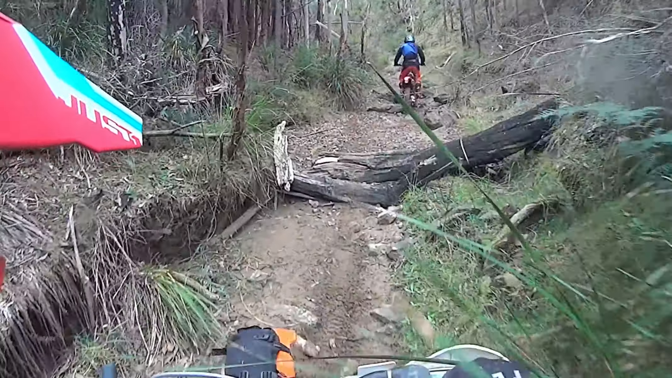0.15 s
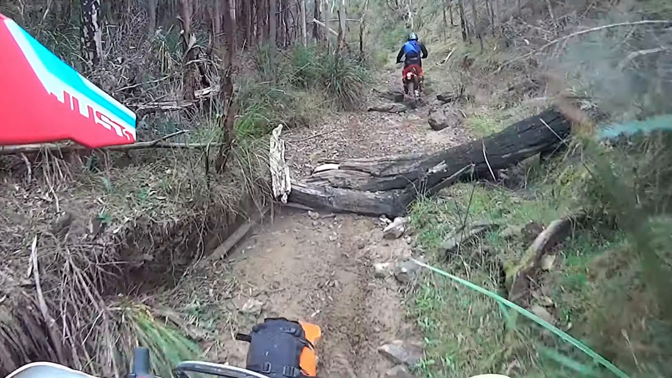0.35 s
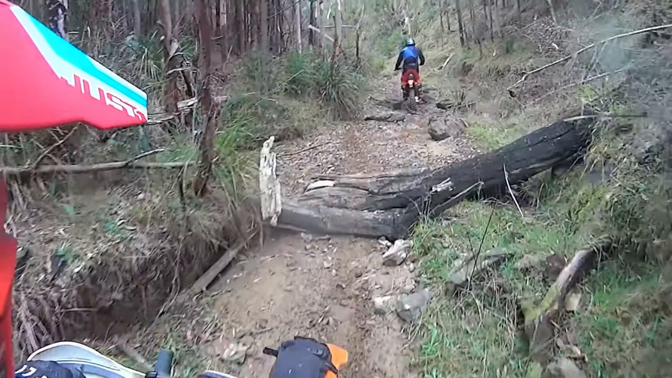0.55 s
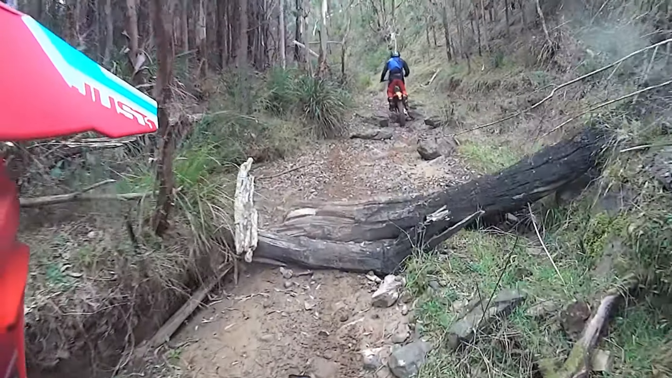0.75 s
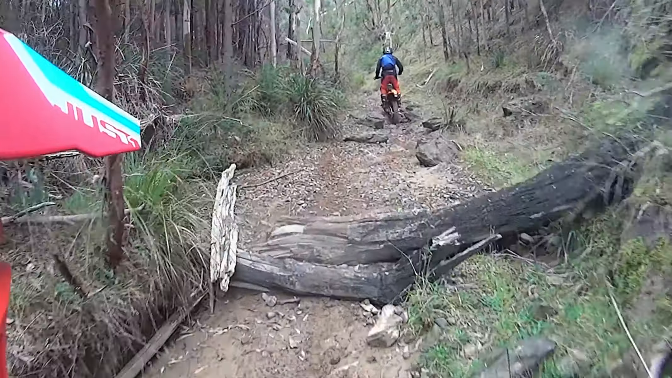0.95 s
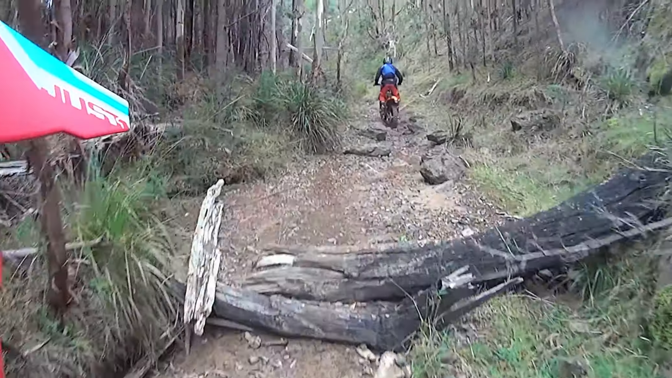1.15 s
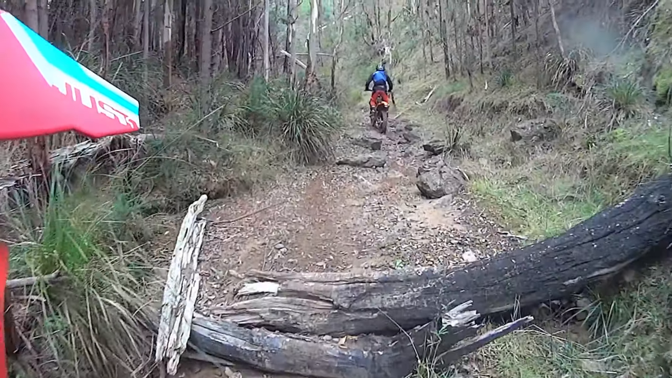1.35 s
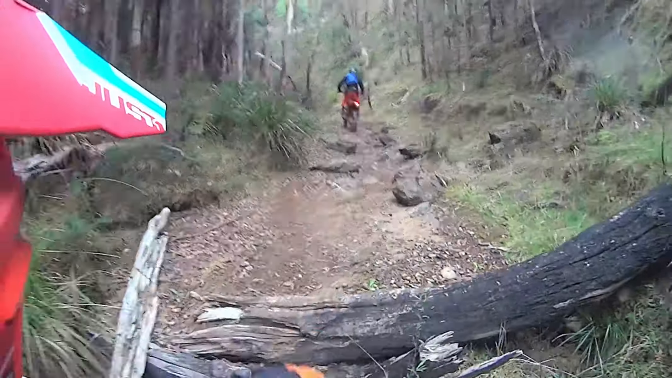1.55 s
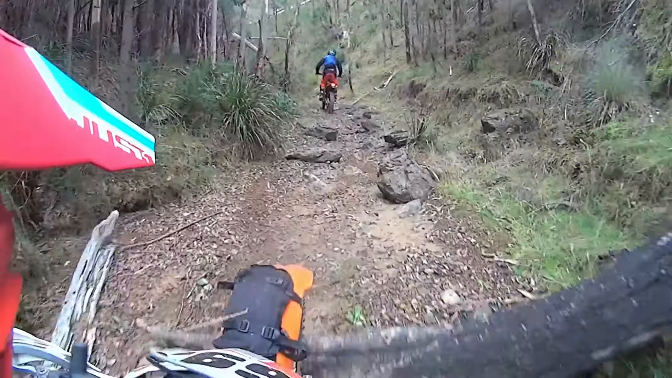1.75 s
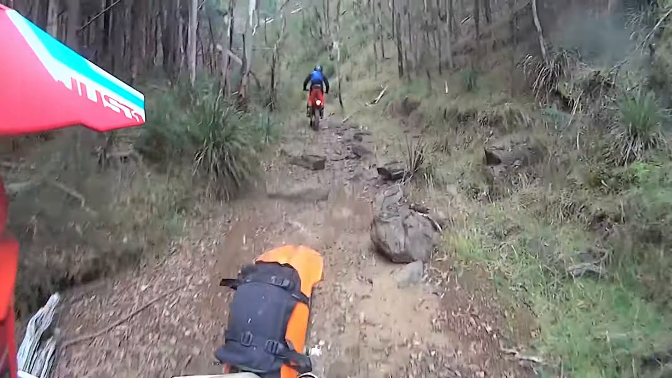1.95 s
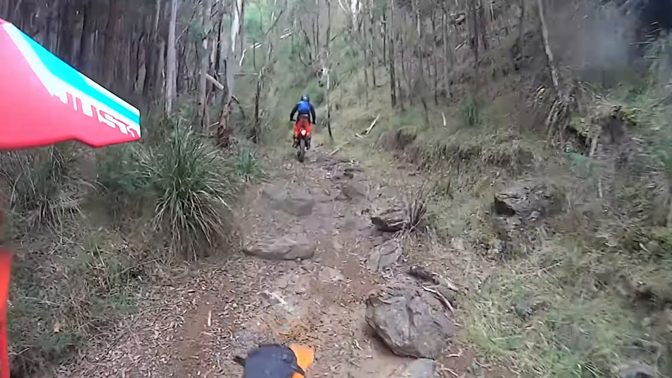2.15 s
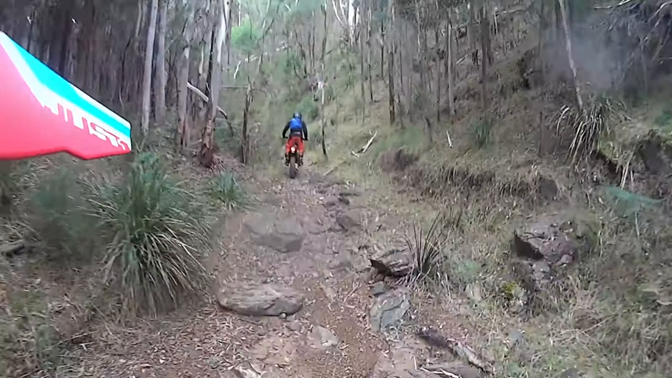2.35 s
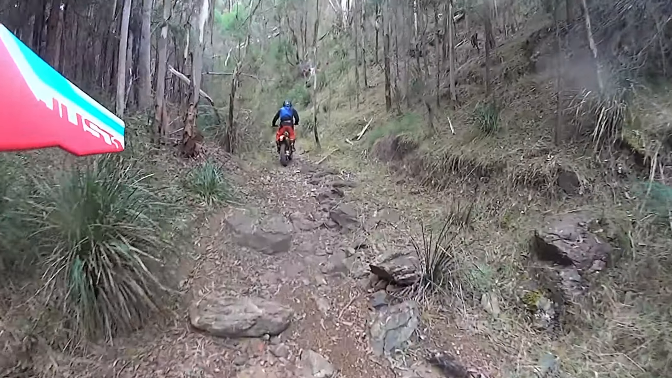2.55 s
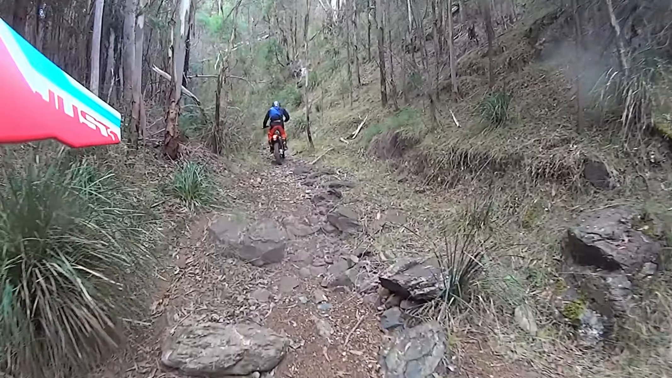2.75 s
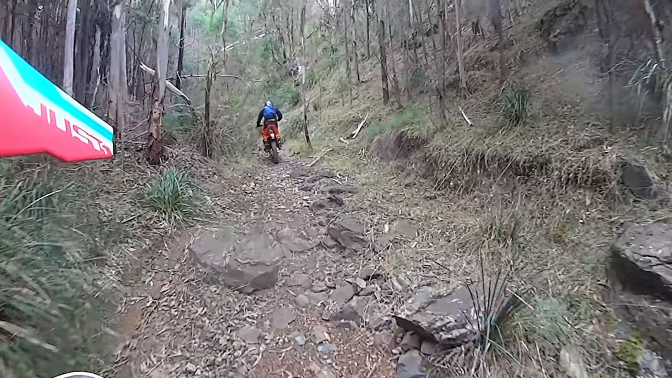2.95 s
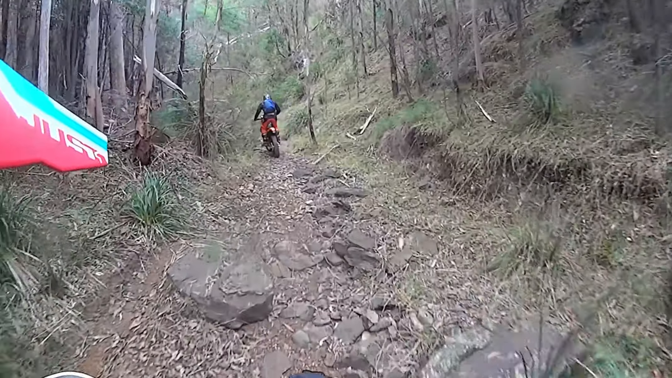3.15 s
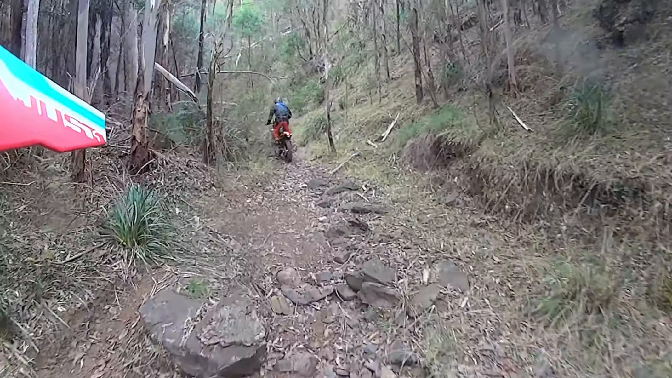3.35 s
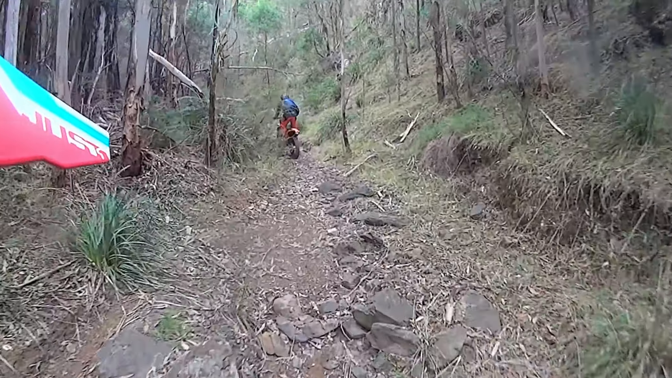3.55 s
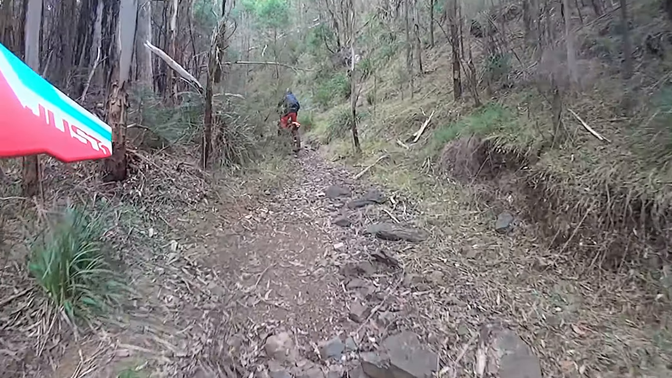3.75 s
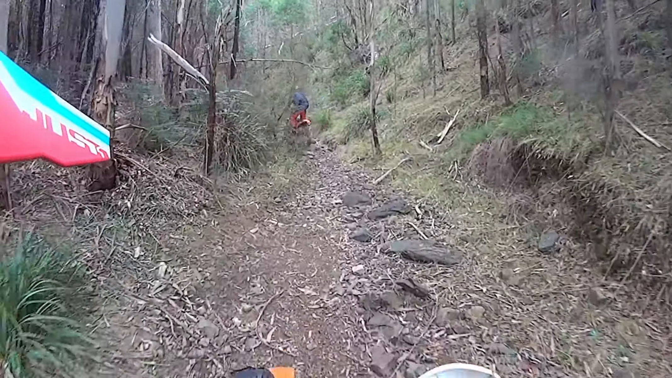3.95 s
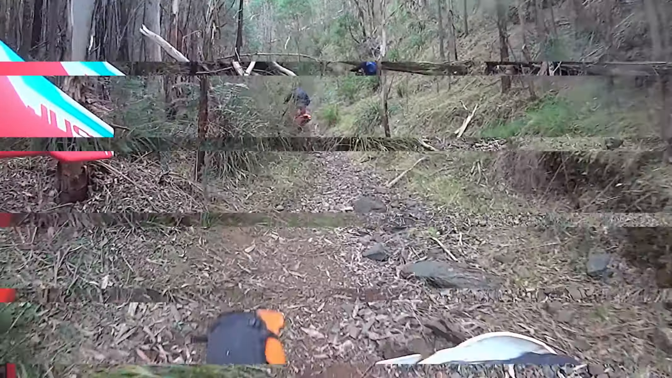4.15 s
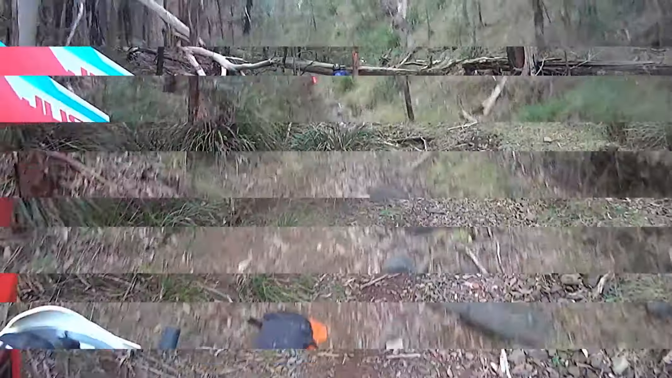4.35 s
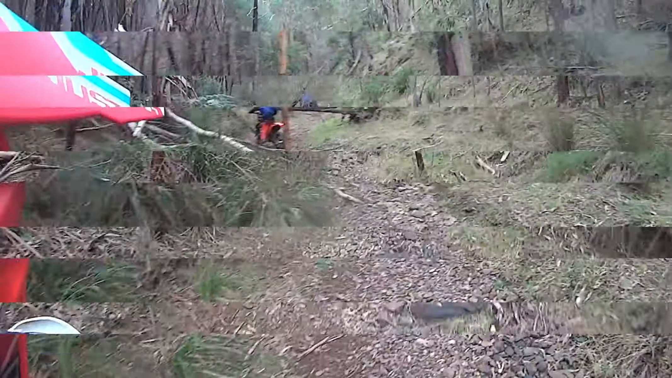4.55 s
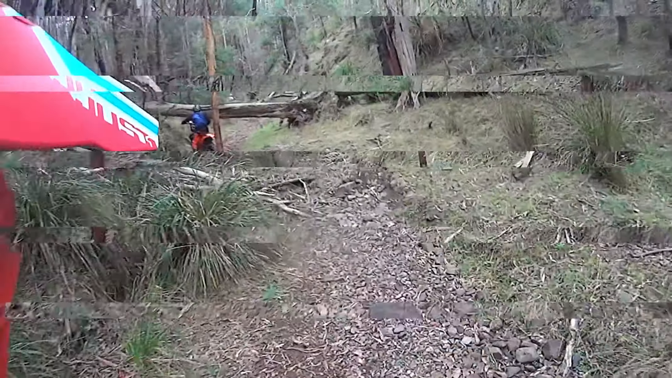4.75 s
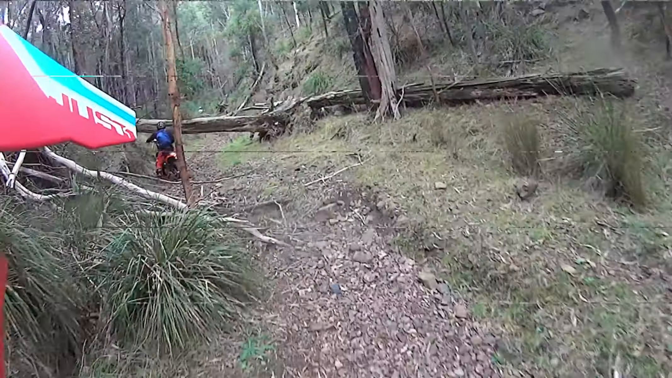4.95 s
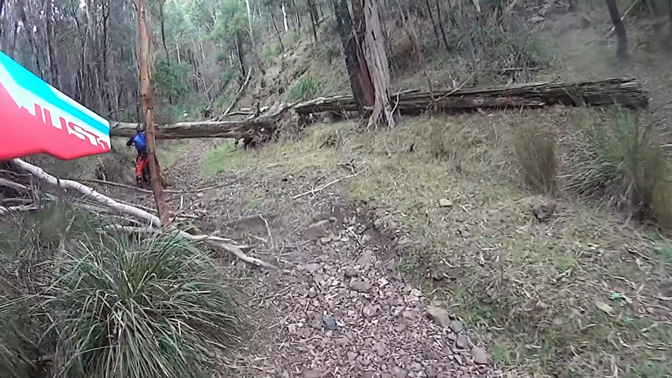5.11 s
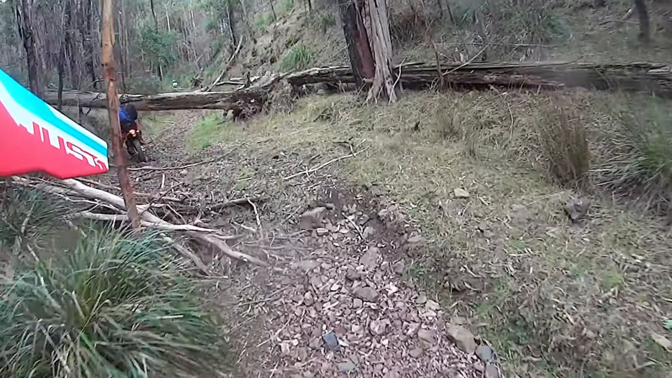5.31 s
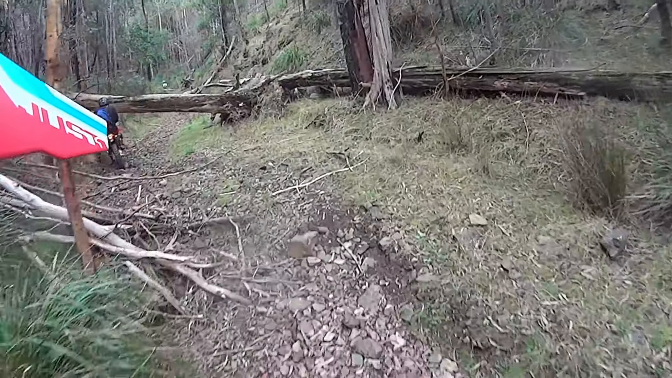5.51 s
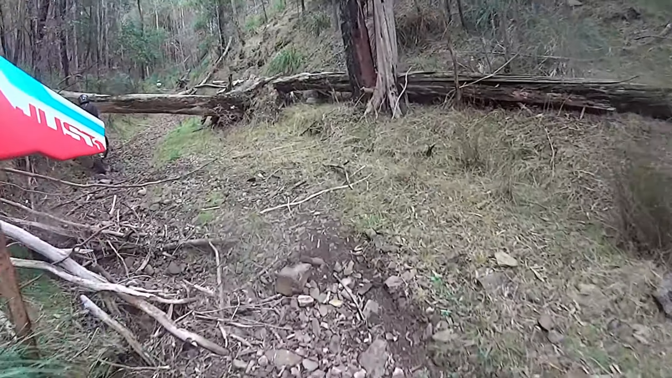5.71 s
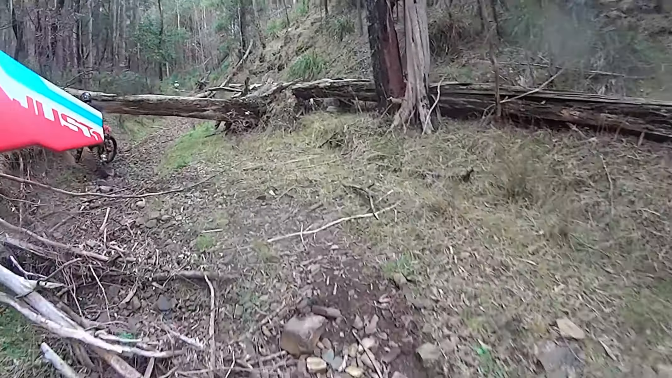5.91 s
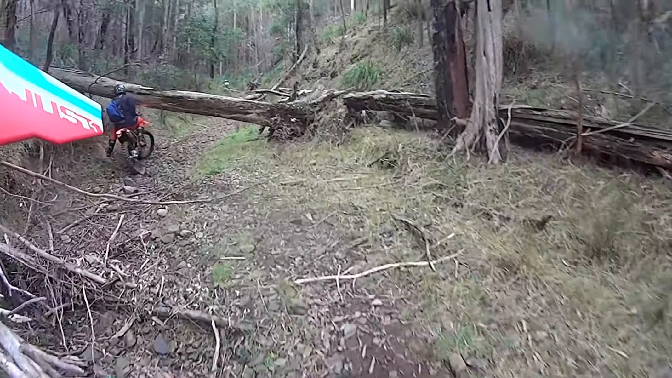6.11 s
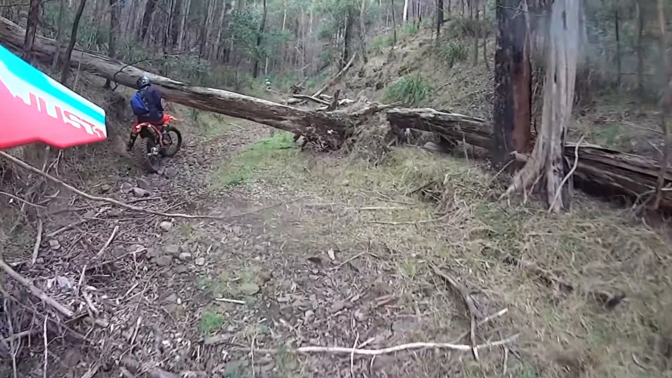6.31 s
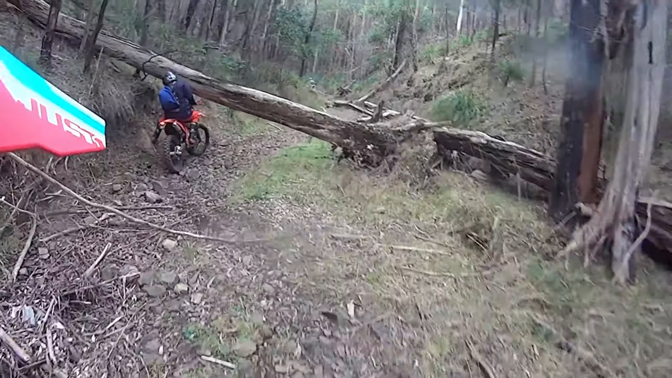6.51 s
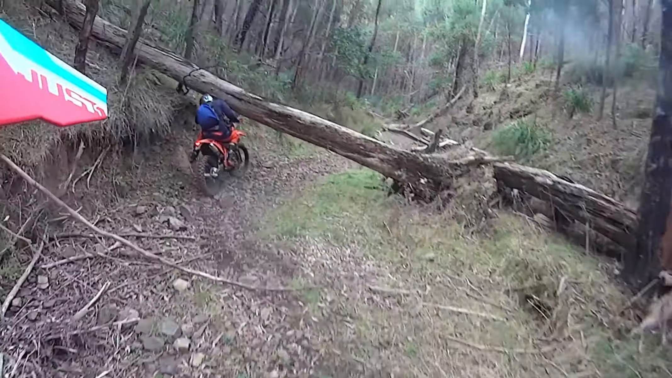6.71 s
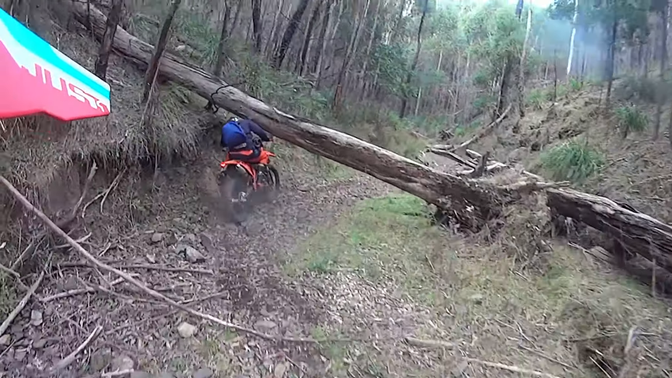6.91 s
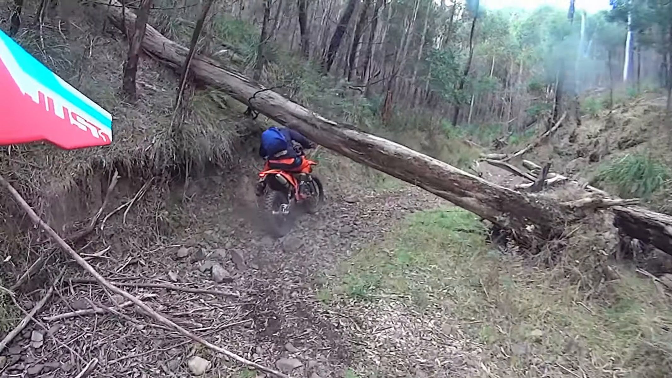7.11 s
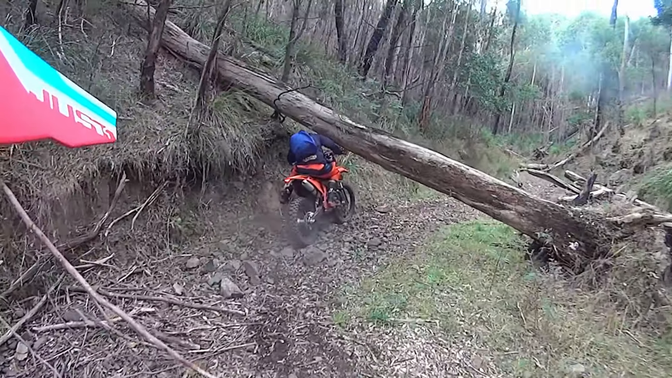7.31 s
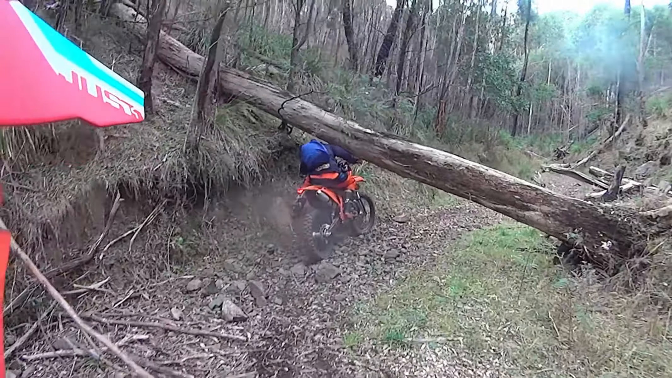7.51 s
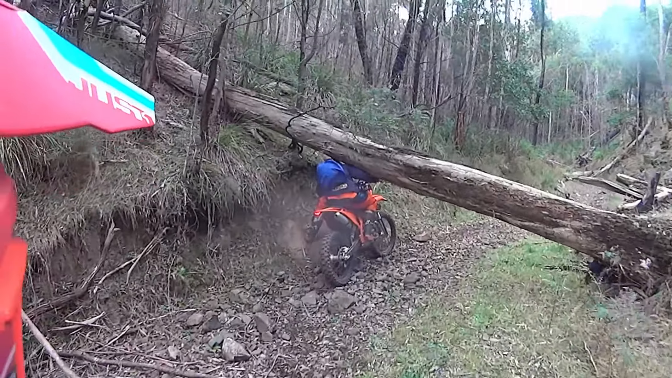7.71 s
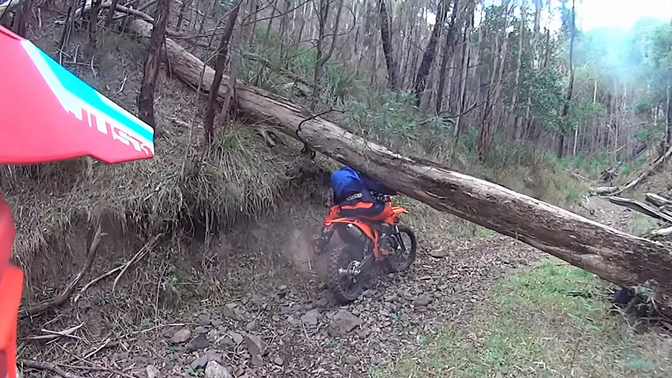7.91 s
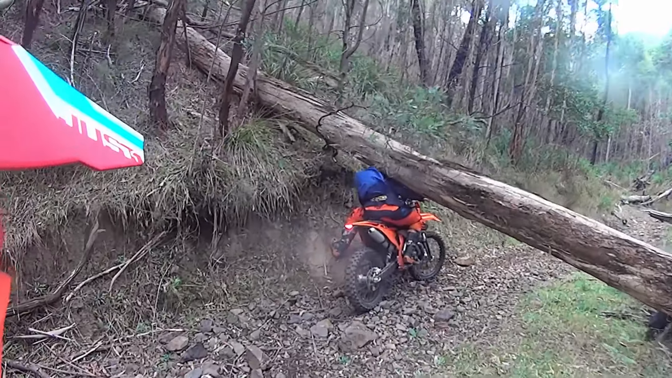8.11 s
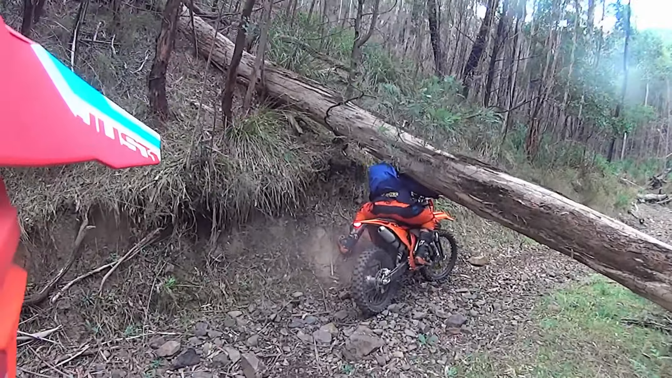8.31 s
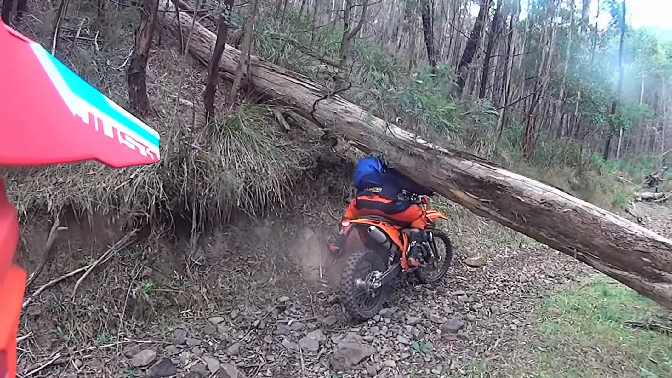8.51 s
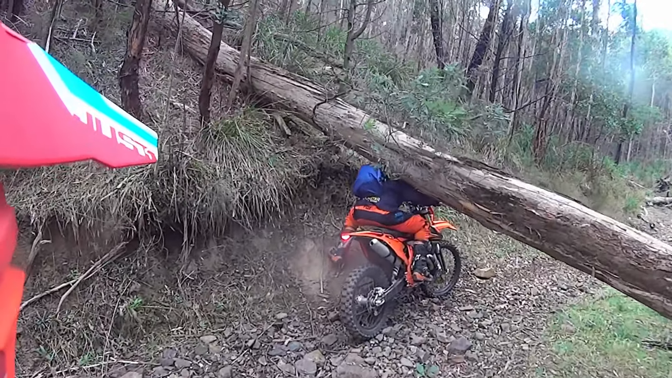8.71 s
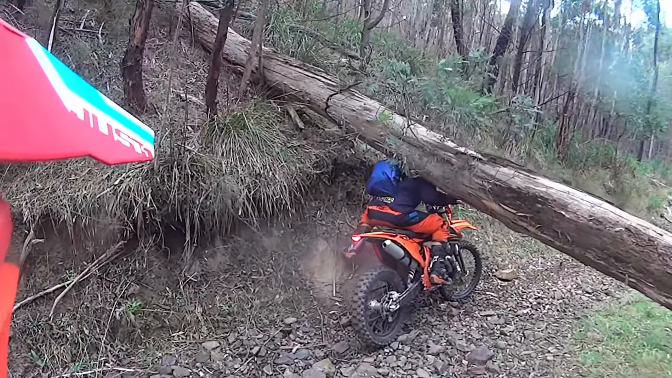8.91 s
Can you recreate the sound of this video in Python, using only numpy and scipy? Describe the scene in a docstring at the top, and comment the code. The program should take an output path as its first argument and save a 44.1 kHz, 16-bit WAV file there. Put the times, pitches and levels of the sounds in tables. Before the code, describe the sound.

An uneven, metallic two-stroke dirt bike putters, revs hard, clatters over a log with a thump, then blips and idles along a stony forest trail.

```python
"""Uneven, metallic firings of a two-stroke dirt bike come first, heard from the rider's helmet on a forest trail.
Each crank turn feeds noise and pulses into resonances: the airbox honks as the throttle opens,
and the thin steel exhaust chamber rings. The bike clatters over a log and lands with a thump of decaying tones.
Random grains and shaped noise make stones crunch and grit scrape under the tyres; low noise is the moving air."""
import sys
import numpy as np
from scipy import signal
from scipy.fft import rfft, irfft, next_fast_len
from scipy.io import wavfile
from scipy.ndimage import uniform_filter1d, map_coordinates

SR = 44100
rng = np.random.default_rng(int(sys.argv[2]) if len(sys.argv) > 2 else 0)


def transcribe(u):
    """Save the signal u as a 16-bit wav file named by the first command-line argument.

    u: samples, shape (n,) or (channels, n), limited to [-1, 1]; the rate is SR.
    q: integer samples, one column per channel.
    """
    v = np.clip(np.atleast_2d(u).T, -1, 1)
    q = np.round(v * 32767).astype(np.int16)
    wavfile.write(sys.argv[1], SR, q)


N = 399535
T = np.arange(N) / SR


def amp(db):
    """Decibels to a linear gain."""
    return 10 ** (np.asarray(db) / 20)


def unit(x):
    """x scaled to rms 1."""
    return x / np.sqrt(np.mean(x ** 2) + 1e-20)


def steady(x):
    """x at rms 1 over about a quarter second; single beats keep their relative size."""
    power = uniform_filter1d(uniform_filter1d(x * x, size=6000), size=6000)
    return x / np.sqrt(np.abs(power) + 1e-4 * np.mean(x * x))


def along(points, hz):
    """Interpolate (frequency [Hz], value) points on a log frequency axis."""
    f, v = np.transpose(points)
    return np.interp(np.log(hz + 1), np.log(f + 1), v)


def wobble(rate):
    """A smooth random curve with rate knots a second."""
    return map_coordinates(rng.standard_normal(int(N * rate / SR) + 4), [T * rate])


def held(rows):
    """Each (from [s], to [s], value) row holds its value; zero elsewhere, overlaps add."""
    return sum(value * ((T >= start) & (T < stop)) for start, stop, value in rows)


def lag(x, seconds):
    """x followed with inertia."""
    keep = np.exp(-1 / (seconds * SR))
    return signal.lfilter([1 - keep], [1, -keep], x)


def swell(s, width):
    """A smooth bump of height 1 around time s."""
    return np.exp(-((T - s) / width) ** 2)


def filtered(x, response):
    """x times a complex response of frequency."""
    m = next_fast_len(N + SR // 2)
    return irfft(rfft(x, m) * response(np.fft.rfftfreq(m, 1 / SR)), m)[..., :N]


def body(modes, f):
    """Causal response of a set of resonances, alternating in sign."""
    out = 0
    for k, (center, width, db) in enumerate(modes):
        damping = 1j * f * width
        out = out + (-1) ** k * amp(db) * damping / (center * center - f * f + damping)
    return out


def band(f, low_hz, high_hz, order=4):
    """Causal band-pass response."""
    return signal.freqs(*signal.butter(order, [low_hz, high_hz], "band", analog=True), f)[1]


def pulses(at, sizes):
    """Single-sample pulses of the given sizes at the given samples."""
    return np.bincount(np.clip(at, 0, N - 1).astype(int), sizes, N)


def rush(train, decay, rise=0.0078):
    """Each pulse lets go a rush of noise that swells and dies away; times in s."""
    envelope = signal.lfilter([1], np.poly(np.exp(-1 / (np.array([decay, rise]) * SR))), train)
    return steady(envelope * rng.standard_normal(N))


def blow(s, db, t60, response):
    """A dying noise burst at time s, rung through a response to a given peak level."""
    t = np.arange(SR // 5) / SR
    burst = amp(-60 * t / t60) * rng.standard_normal(len(t))
    ring = irfft(rfft(burst) * response(np.fft.rfftfreq(len(t), 1 / SR)), len(t))
    return pulses(round(s * SR) + np.arange(len(t)), amp(db) * ring / np.abs(ring).max())


# decay of the woodland tail: (frequency [Hz], t60 [s])
FOREST_DECAY = [(200, 0.44), (2000, 0.24), (10000, 0.0091)]


def forest(x):
    """Trunks and banks scatter a short tail, different at each port."""
    hz, t, z = signal.stft(rng.standard_normal((2, SR // 2)), SR, nperseg=256)
    decay = amp(-60 * t / along(FOREST_DECAY, hz)[:, None])
    tail = signal.istft(z * decay, SR, nperseg=256)[1]
    delayed = np.pad(x, (400, 0))[None]  # the tail starts about 9 ms late
    return signal.fftconvolve(delayed, tail / np.linalg.norm(tail[0]), axes=1)[:, :N]


# shading by the helmet: (frequency [Hz], left minus right [dB])
PORT_LEAN = [(30, 2), (130, -2.5), (500, -4.5), (1100, 0.5), (2000, -2.5), (9000, -0.5)]
# phase between the ports: (frequency [Hz], lead of the left port [rad])
PORT_LEAD = [(30, -1.4), (130, -0.066), (650, -1.565), (2700, -0.64), (5000, -1.45), (10000, -1.64)]


def ports(x):
    """The helmet shades and delays the sound differently at the two microphone ports."""
    sides = np.array([[.5], [-.5]])
    return filtered(x, lambda f: amp(sides * along(PORT_LEAN, f)) * np.exp(1j * sides * along(PORT_LEAD, f)))


# swells of air around the helmet: (time [s], half width [s], level [dB])
AIR_GUSTS = [(.48, 0.2, -40), (2.1, 0.32, -35.5)]
AIR_DB = -57.5  # between gusts


def helmet_air():
    """Moving air rumbles around the helmet as very low noise, with a few swells."""
    rumble = unit(filtered(rng.standard_normal(N), lambda f: band(f, 31.5, 41.0, order=2)))
    gusts = amp(AIR_DB) + sum(amp(db) * swell(s, width) for s, width, db in AIR_GUSTS)
    return gusts * rumble


def gravel(rows):
    """Sparse grains of random size, 300 a second, over a bed of noise."""
    shape = (rows, N)
    grains = (rng.random(shape) < 300 / SR) * amp(0.43 * np.minimum(rng.exponential(size=shape), 4))
    return 0.95 * unit(grains) + rng.standard_normal(shape)


# tone of the tyres on stones: (frequency [Hz], relative density [dB per Hz])
TYRE_SPECTRUM = [(30, -16), (140, -5.5), (280, -7), (850, -5.5), (1050, -21.5), (2000, -9.5), (11000, -33)]


def tyre_crunch():
    """Gravel crunches under the tyres, its level wandering."""
    crunch = unit(filtered(gravel(1)[0], lambda f: amp(along(TYRE_SPECTRUM, f))))
    return amp(-44.0 + 2.6 * wobble(6)) * ports(crunch)


# tyres and boots scrape grit and scrub: (from [s], to [s], grit level [dB], rasp level on the metal [dB])
SCRAPE_STROKES = [(0.988, 1.012, -38, -26), (1.403, 1.569, -30.5, -22), (3.015, 3.168, -54, -30.5),
                  (3.437, 3.748, -42, -34.5), (4.918, 5.273, -40, -37), (5.29, 5.496, -39, -30.5),
                  (5.78, 5.833, -50, -28)]
# tone of fine grit, and of torn air: (frequency [Hz], relative density [dB per Hz])
GRIT_SPECTRUM = [(1500, -2), (3200, 5), (5000, 6), (6500, -7.5), (8300, -14.5), (10000, -3), (11000, -19.5)]
SCRAPE_LAG_S = 0.008


def grit_scrape():
    """Fine grit flies to both sides with each scrape, over a faint constant spray."""
    spray = unit(filtered(gravel(2), lambda f: amp(along(GRIT_SPECTRUM, f))))
    strokes = lag(held((start, stop, amp(db)) for start, stop, db, _ in SCRAPE_STROKES), SCRAPE_LAG_S)
    return (strokes + amp(-59)) * amp(2.6 * wobble(22) + 3.0 * wobble(170)) * spray


# resonances of the engine cases: (frequency [Hz], width [Hz], relative level [dB])
CASE_MODES = [(837, 70, -1), (1350, 63, 5.5), (2023, 480, -1.5), (2926, 183, 3.5), (3218, 167, 0.5),
              (4017, 196, -9), (4460, 290, -11.5)]


def rasp():
    """Each scrape also rubs grit and scrub along the engine cases."""
    strokes = lag(held((start, stop, amp(db)) for start, stop, _, db in SCRAPE_STROKES), SCRAPE_LAG_S)
    rubbing = amp(3 * wobble(120)) * rng.standard_normal(N)
    return strokes * unit(filtered(rubbing, lambda f: body(CASE_MODES, f) * band(f, 2300, 5600, order=2)))


# stones flicked against metal: (time [s], peak [dB], pitch [Hz], snap over the ring [dB])
STONE_HITS = [(2.112, -16, 4597, -10), (2.245, -16, 4700, -17), (7.711, -22, 3700, -1)]


def stone_flicks():
    """A flicked stone rings the metal at one pitch, with a bright snap on top."""
    out = np.zeros(N)
    for s, db, hz, snap_db in STONE_HITS:
        out += blow(s, db, .018, lambda f: body([(hz, 900, 0)], f) ** 2
                    + amp(snap_db) * band(f, 2700, 11000, order=2))
    return out


# wheels and suspension land: (time [s], level [dB], pitch [Hz], t60 [s])
LANDING_THUMPS = [(2.184, -8, 403, 0.045), (2.188, -10, 490, 0.03), (2.243, -9.5, 45.59, 0.091),
                  (2.245, -17, 170, 0.073), (2.253, -13.5, 82, 0.086), (2.272, -19.5, 259.7, 0.057),
                  (2.37, -25.5, 138.1, 0.21)]


def landing():
    """Wheels and suspension land as short decaying tones with a soft attack."""
    out = np.zeros(N)
    t = np.arange(SR // 4) / SR
    attack = 1 - np.exp(-t / 0.00063)
    for s, db, hz, t60 in LANDING_THUMPS:
        tone = amp(db - 60 * t / t60) * np.sin(2 * np.pi * hz * t)
        out += pulses(round(s * SR) + np.arange(len(t)), tone * attack)
    return out


# chain and frame clacks: (time [s], peak [dB], burst t60 [s])
FRAME_CLACKS = [(1.699, -9, 0.044), (2.052, -6.5, 0.055), (2.058, -10.5, 0.031), (2.112, -5, 0.03),
                (2.302, -5.5, 0.018), (2.336, -11, .016), (2.477, -18, 0.029)]
# resonances of the frame: (frequency [Hz], width [Hz], relative level [dB])
FRAME_MODES = [(483, 325, -15), (880, 190, -1.5), (1280, 230, 7.5), (1609, 630, 4.5), (2120, 160, 5.5),
               (2770, 303, -7)]


def clacks():
    """Chain and frame clack as noise bursts rung through the frame."""
    return sum(blow(s, db, t60, lambda f: body(FRAME_MODES, f) * band(f, 320, 3500, order=2))
               for s, db, t60 in FRAME_CLACKS)


JUDDER_S, JUDDER_HOLD_S, JUDDER_FADE_S, JUDDER_DB = 2.19, 0.268, 0.021, -28.5


def judder():
    """Bodywork and luggage rattle after the landing: random taps shake the frame, then fade."""
    taps = (rng.random(N) < 220 / SR) * amp(2 * rng.standard_normal(N))
    shake = filtered(rush(taps, decay=0.011, rise=0.00064),
                     lambda f: body(FRAME_MODES, f) * band(f, 480, 1020, order=2)
                     + amp(-6.5) * band(f, 106, 726, order=2))
    hold = held([(JUDDER_S, JUDDER_S + JUDDER_HOLD_S, amp(JUDDER_DB))])
    return lag(hold, JUDDER_FADE_S) * unit(shake)


# a rising engine harmonic, then ringing metal:
# (from [s], to [s], start pitch [Hz], end pitch [Hz], middle level [dB])
SINGING_TONES = [(1.184, 1.286, 220, 312.6, -19.5), (1.29, 1.37, 1700, 1731, -19),
                 (1.366, 1.499, 2067, 2110, -22), (1.583, 1.728, 2080, 2070, -18.5),
                 (1.852, 2.09, 1253, 1260, -23), (5.938, 5.966, 1240, 1212, -26.5),
                 (6.65, 6.697, 1243, 1224, -26)]


def singing():
    """Short wavering tones: one rising engine harmonic, then ringing metal."""
    out = np.zeros(N)
    for start, stop, start_hz, end_hz, db in SINGING_TONES:
        u = np.interp(T, [start, stop], [0, 1])
        glide_hz = start_hz + (end_hz - start_hz) * u
        angle = 2 * np.pi * np.cumsum(glide_hz) / SR + start_hz / 1300 * wobble(110)
        out += amp(db + 4.2 * wobble(45)) * np.sin(np.pi * u) * np.sin(angle)
    return out


# throttle holds: (from [s], to [s], first opening [0-1], last opening [0-1],
#                  crank speed reached [Hz], exhaust bark [dB])
THROTTLE_HOLDS = [(0, 0.209, 0.15, 0.1, 37.72, 5), (0.215, .44, 0.21, 0.38, 46.33, 3),
                  (.44, 1.071, 0, 0.12, 34.07, 2.5), (1.088, 1.215, 0.4, 1, 62.5, 3),
                  (1.22, 1.389, 0.93, 0.92, 97.4, 6), (1.385, 1.577, 0.79, 0.71, 99.5, 5.5),
                  (1.58, 1.925, 0.79, 0.64, 76.4, 6.5), (1.926, 2.502, 0.01, 0.02, 51, 0),
                  (2.498, 3.002, 0.02, 0.05, 41, -1), (3.001, 3.181, 0.17, 0.15, 40.2, 2.5),
                  (3.415, 3.528, 0.48, 0.72, 53.2, 5), (3.531, 3.675, 0.43, 0.44, 60.3, 3.5),
                  (3.68, 3.901, 0.46, 0.46, 44.83, 4.5), (3.899, 4.04, 0.46, 0.86, 55.75, 7),
                  (4.037, 4.15, 0.82, 0.51, 62.9, 6.5), (4.152, 4.429, 0.49, 0.51, 48.1, 1.5),
                  (4.518, 4.799, 0.48, 0.4, 47.47, -0.5), (4.8, 5.019, 0.03, 0.29, 41, 1),
                  (5.022, 5.221, 0.58, 0.39, 45.85, 2), (5.222, 5.623, 0.24, 0.46, 45, 2.5),
                  (5.622, 5.74, 0.36, 0.82, 52.1, 3), (5.743, 5.836, 0.7, 0.6, 62.96, 4),
                  (5.837, 6.05, 0.04, 0.01, 42.88, -0.5), (6.052, 6.601, 0.24, 0.34, 48, 1.5),
                  (6.6, 7.24, 0.01, 0.04, 35.08, -1.5), (7.24, 7.39, 0.24, 0.76, 54, 0.5),
                  (7.392, 7.447, 0.7, .45, 61, 2), (7.451, 8.15, 0.02, 0.01, 39.5, 0),
                  (8.303, 8.358, 0.62, 0.39, 42.12, 1.5), (8.519, 8.596, 0.33, 0.78, 51.1, 2),
                  (8.6, 8.758, 0.53, 0.42, 58.94, -0.5), (8.764, 9.059, 0.01, 0.01, 50.4, -3.5)]
# further crank speeds on the way: (time [s], crank speed [Hz])
CRANK_BENDS = [(1.17, 53), (1.26, 73), (1.3, 79), (1.35, 87), (1.43, 106), (1.49, 93), (1.56, 104),
               (1.63, 80), (1.72, 74), (1.77, 78), (1.82, 70), (1.9, 77), (3.94, 49), (4.6, 46.5),
               (4.71, 44.3)]
CRUISE_HZ, COAST_S = 40, 1.6  # starting and reference crank speed; time constant of coasting down


def crank():
    """Throttle holds take the crank to new speeds, coasting between; further knots bend the crank speed."""
    knots = [(0.00073, CRUISE_HZ)]

    def coasted(s):
        last_s, last_hz = knots[-1]
        return s, last_hz * np.exp((last_s - s) / COAST_S)

    for start, stop, *_, hz, _ in THROTTLE_HOLDS:
        knots += [coasted(start), (stop, hz)]
    knots.append(coasted(T[-1]))
    s, hz = np.transpose(sorted(knots + list(map(tuple, CRANK_BENDS))))
    return np.exp(np.interp(T, s, np.log(hz))) * (1 + .003 * wobble(35))


def turns(hz):
    """The sample at which each crank turn starts."""
    return np.flatnonzero(np.diff(np.floor(np.cumsum(hz) / SR)))


SHUT_LAG_S, OPEN_LAG_S = 0.0055, 0.012  # the slide shuts faster than it opens


def throttle_slide():
    """The slide follows the rider's grip with inertia, 0 shut to 1 open."""
    grip = np.zeros(N)
    for start, stop, first, last, _, _ in THROTTLE_HOLDS:
        span = (T >= start) & (T < stop)
        grip[span] = np.linspace(first, last, span.sum())
    return np.clip(np.minimum(lag(grip, SHUT_LAG_S), lag(grip, OPEN_LAG_S)), 0, 1)


BARK_LAG_S, BARK_FADE_S = 0.0027, 0.032


def exhaust_bark():
    """The bark of each throttle hold [dB] comes quickly and dies away more slowly."""
    load_db = held((start, stop, db) for start, stop, *_, db in THROTTLE_HOLDS)
    return np.maximum(lag(load_db, BARK_LAG_S), lag(load_db, BARK_FADE_S))


# gear and crank tones: (multiple of the crank speed, relative level [dB])
HUM_ORDERS = [(1, -1), (2, -21), (3, -21), (4, -15), (5, -8), (6, -1.5), (7, -9), (9, -13)]
HUM_DB, HUM_OCTAVE_DB = -46, 11  # gain at cruising speed, and growth an octave of revs


def gear_hum(crank_hz, throttle):
    """Off the throttle the crank throbs and the gears hum in multiples of the crank speed."""
    angle = 2 * np.pi * np.cumsum(crank_hz * (1 + .003 * wobble(25))) / SR
    hum = sum(amp(db + 1.6 * wobble(6.2)) * np.sin(k * angle) for k, db in HUM_ORDERS)
    hum *= amp(HUM_DB + HUM_OCTAVE_DB * np.log2(np.minimum(crank_hz, 55) / CRUISE_HZ))
    return (1 - throttle) ** 2 * hum


def rattle(starts, rattle_db):
    """The piston slaps once a turn and the chain at random, rung through the engine cases."""
    slaps = pulses(starts, amp(2.2 * rng.standard_normal(len(starts))))
    links = (rng.random(N) < 90 / SR) * amp(-6 + 2.5 * rng.standard_normal(N))
    knock = rush(slaps + links, decay=0.013, rise=0.0025) + 0.75 * rng.standard_normal(N)
    return amp(rattle_db) * steady(filtered(knock, lambda f: body(CASE_MODES, f) * band(f, 494, 7540)))


def hiss(starts, hiss_db):
    """Air tears past the throttle slide with each gulp, over constant noise."""
    air = rush(pulses(starts, np.ones(len(starts))), decay=0.014) + rng.standard_normal(N)
    torn = filtered(air, lambda f: amp(along(GRIT_SPECTRUM, f)) * band(f, 1700, 9100, order=2))
    return amp(hiss_db) * unit(torn)


# single hard gulps as the throttle snaps open: (time [s], peak [dB])
AIRBOX_CHUFFS = [(1.113, -18.5), (1.173, -17), (3.457, -25), (3.504, -23.5), (5.71, -23)]
# resonances of the airbox: (frequency [Hz], width [Hz], relative level [dB])
AIRBOX_MODES = [(234, 75, -1.5), (293, 44.5, -1), (404, 113, -9.5)]
# resonances of the intake throat: (frequency [Hz], width [Hz], relative level [dB])
THROAT_MODES = [(628, 31.5, 3), (812.4, 40.4, -15)]


def chuffs():
    """Hard gulps ring airbox and throat together."""
    return sum(blow(s, db, 0.089, lambda f: body(AIRBOX_MODES + THROAT_MODES, f) * band(f, 195, 850))
               for s, db in AIRBOX_CHUFFS)


# the engine pulls cleanly, with little sputter: (from [s], to [s])
CLEAN_PULLS = [(1.25, 1.93), (4.0, 4.2), (4.52, 4.8), (5.76, 5.85), (7.38, 7.46)]
INTAKE_DB, INTAKE_OPEN_DB = -52, 33  # throttle shut, and growth to full throttle
BOX_SWAY_DB = 2.5  # each airbox resonance swells and sinks on its own


def intake(starts, throttle, crank_hz):
    """The piston gulps air once a turn, more evenly in clean pulls; the open throat adds a honk."""
    sputter = 1 - .88 * lag(held((start, stop, 1) for start, stop in CLEAN_PULLS), .02)
    uneven = sputter[starts]
    chance = rng.standard_normal((len(starts), 2))
    alternate = (-1) ** np.arange(len(starts))
    sizes_db = 1.2 * uneven * alternate + (.9 + 1.3 * uneven) * chance[:, 0]
    gulps = pulses(starts + .00022 * SR * uneven * chance[:, 1], amp(sizes_db))
    gulps = steady(gulps) + (.05 + .27 * sputter) * rush(gulps, decay=.006, rise=.002)
    box = np.zeros(N)
    for k, mode in enumerate(AIRBOX_MODES):
        ring = filtered(gulps, lambda f: body([mode], f) * band(f, 170, 600, order=3))
        box += (-1) ** k * amp(BOX_SWAY_DB * wobble(18)) * ring
    honk = filtered(gulps, lambda f: body(THROAT_MODES, f) * band(f, 605, 920, order=2))
    honk_db = 0.5 + 12 * throttle ** 4 * np.clip(crank_hz / 80, 0, 1)
    voice = steady(box + amp(honk_db) * honk)
    return amp(INTAKE_DB + INTAKE_OPEN_DB * throttle ** 0.76) * voice + chuffs()


# hard firings that ping the chamber: (time [s], peak [dB])
CHAMBER_PINGS = [(0.028, -17), (0.136, -22), (0.2475, -17.5), (0.3529, -15.5), (0.398, -18.5), (0.873, -19),
                 (3.453, -15), (3.4983, -9), (3.607, -14), (3.713, -16), (3.8526, -14), (3.901, -10),
                 (4.9344, -14), (5.024, -17), (5.08, -13.5), (6.002, -21), (6.088, -17), (6.192, -17.5),
                 (6.2958, -18), (6.353, -16), (6.4866, -14.5), (6.529, -19), (6.576, -18), (7.96, -23),
                 (8.0072, -20.5), (8.032, -23), (8.128, -25), (8.178, -26)]
# resonances rung by hard firings: (frequency [Hz], width [Hz], relative level [dB])
SEAM_MODES = [(1280, 240, -2.5), (1680, 41, 6), (2033, 117, 13.5), (3000, 310, 4), (4370, 2300, -5)]


def pings():
    """Hard firings ring the seams of the steel chamber."""
    return sum(blow(s, db, 0.059, lambda f: body(SEAM_MODES, f) * band(f, 940, 4700, order=3))
               for s, db in CHAMBER_PINGS)


# resonances of the exhaust chamber: (frequency [Hz], width [Hz], relative level [dB])
CHAMBER_MODES = [(1246.7, 49, 7), (1337, 224, -3), (1403, 52, 0), (1698, 50, 2.5), (1860, 620, -8),
                 (2112, 84, 1.5), (2340, 61, -11.5), (2556, 130, -7.5), (2940, 47, -16), (3310, 100, -15)]
# tone of the exhaust gas: (frequency [Hz], relative density [dB per Hz])
GAS_SPECTRUM = [(60, -15.5), (600, -15.5), (1020, -47), (1300, -57), (3200, -17), (3700, -13.5),
                (5000, -14), (6000, -36), (8300, -38.5), (9900, -32), (11000, -39)]


def chamber(f):
    """Response of the ringing steel shell over its broad gas noise."""
    return body(CHAMBER_MODES, f) * band(f, 1140, 4000) + amp(along(GAS_SPECTRUM, f) - 2.0)


def exhaust(starts, chamber_db, throttle, crank_hz):
    """Under load turns fire evenly; at light load over half are weak, and timing is randomly late."""
    chance = rng.random((len(starts), 3))
    pull = throttle * np.clip((crank_hz - 35) / 30, 0, 1)
    slack = 1 - pull[starts]
    stroke = np.cumsum(chance[:, 0] > .12)  # now and then the alternation misses a beat
    fires = np.diff(stroke, prepend=0) * (stroke % 2)
    sizes_db = slack * (-7 * (1 - fires) + 4 * chance[:, 1])
    bangs = pulses(starts + .005 * SR * slack * chance[:, 2], amp(sizes_db))
    ringing = steady(filtered(bangs, lambda f: body(CHAMBER_MODES, f) * band(f, 1100, 3800)))
    puffs = rush(bangs, decay=.009, rise=.0012) + .32 * rng.standard_normal(N)
    gas = steady(filtered(puffs, chamber))
    return amp(chamber_db) * steady((.4 + 1.0 * pull) * ringing + gas) + pings()


# levels at cruising speed with the throttle shut and no bark [dB]; growth an octave of revs [dB]
CHAMBER_DB, CHAMBER_OCTAVE_DB = -35, 6.5
RATTLE_DB, RATTLE_OCTAVE_DB, RATTLE_BARK_SHARE = -33.5, 4, 0.78
HISS_DB, HISS_OCTAVE_DB, HISS_OPEN_DB = -51.5, 6, 16.5  # the last is growth to full throttle


def engine():
    """Throttle and revs set the level of every part of the engine."""
    throttle, bark_db, crank_hz = throttle_slide(), exhaust_bark(), crank()
    octaves, starts = np.log2(crank_hz / CRUISE_HZ), turns(crank_hz)
    chamber_db = CHAMBER_DB + CHAMBER_OCTAVE_DB * octaves + bark_db
    rattle_db = RATTLE_DB + RATTLE_OCTAVE_DB * octaves + RATTLE_BARK_SHARE * bark_db
    hiss_db = HISS_DB + HISS_OCTAVE_DB * octaves + HISS_OPEN_DB * throttle
    return (intake(starts, throttle, crank_hz) + exhaust(starts, chamber_db, throttle, crank_hz)
            + rattle(starts, rattle_db) + gear_hum(crank_hz, throttle) + hiss(starts, hiss_db))


DIP_S, DIP_WIDTH_S, DIP_DB = 2.205, 0.032, -11  # the engine's level dips briefly around the landing


def scene():
    """The bike and its forest echo, over the trail and the air around the helmet."""
    trail = tyre_crunch() + grit_scrape() + helmet_air()
    jolts = clacks() + landing() + stone_flicks() + judder()
    dipped_engine = engine() * amp(DIP_DB * swell(DIP_S, DIP_WIDTH_S))
    bike = dipped_engine + rasp() + singing() + jolts
    echo = amp(-14) * forest(filtered(bike, lambda f: f > 150))
    return amp(0.5) * ports(bike) + echo + trail


TOP_HZ = 11100


def record(dry):
    """Nothing above the band limit passes."""
    return filtered(dry, lambda hz: hz < TOP_HZ)


dry = scene()
out = record(dry)
transcribe(out)
```